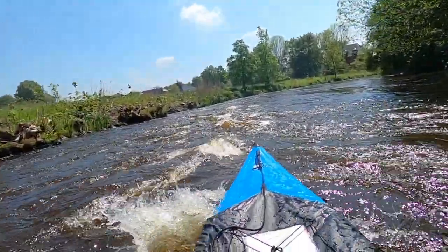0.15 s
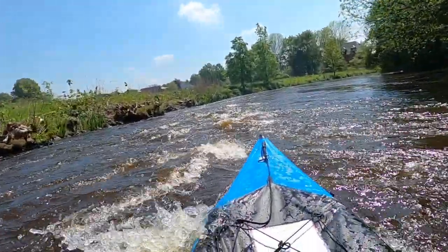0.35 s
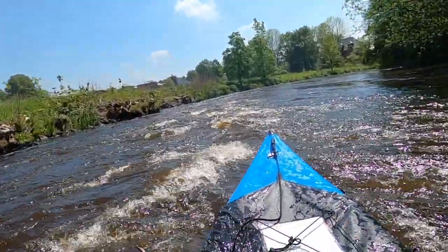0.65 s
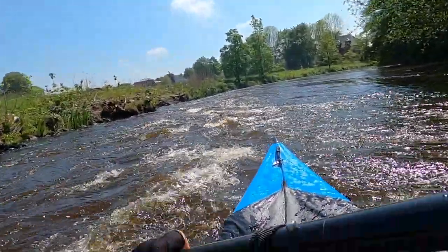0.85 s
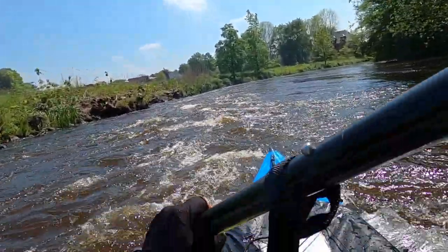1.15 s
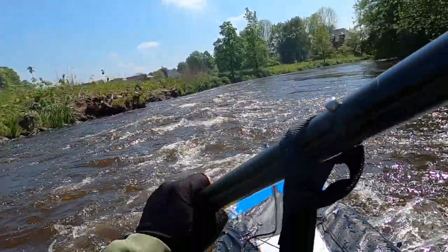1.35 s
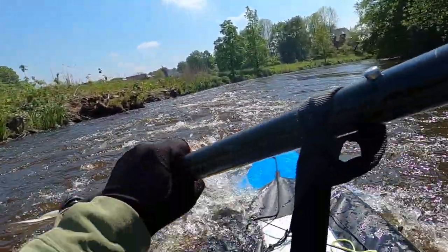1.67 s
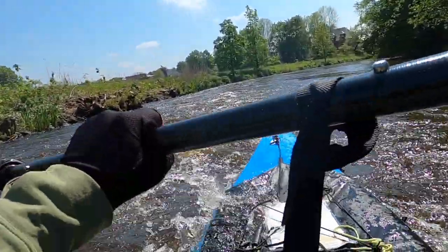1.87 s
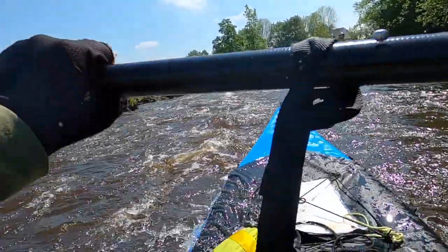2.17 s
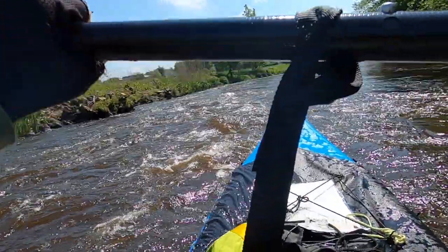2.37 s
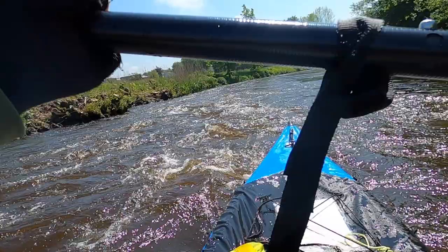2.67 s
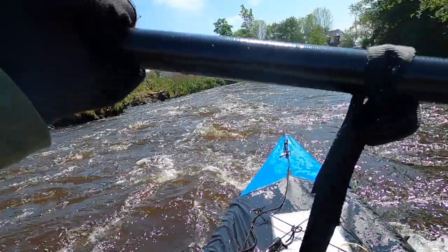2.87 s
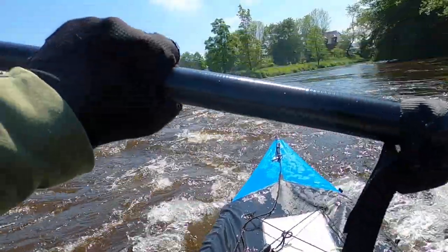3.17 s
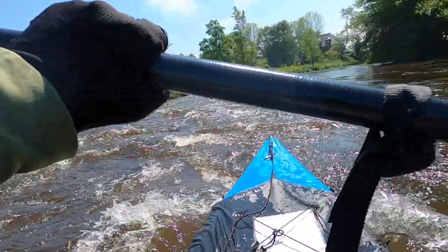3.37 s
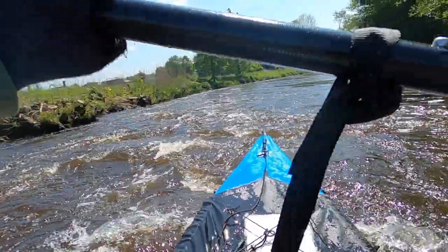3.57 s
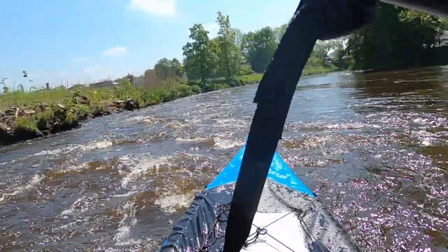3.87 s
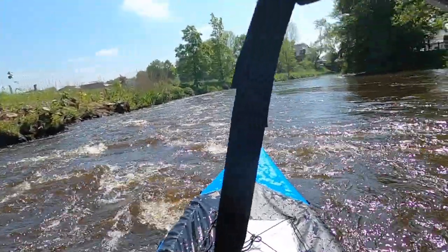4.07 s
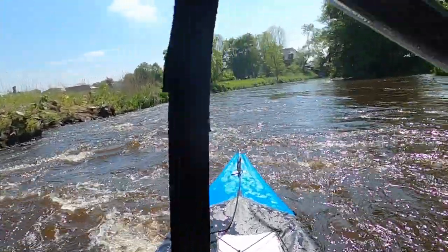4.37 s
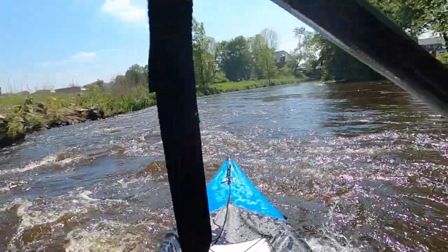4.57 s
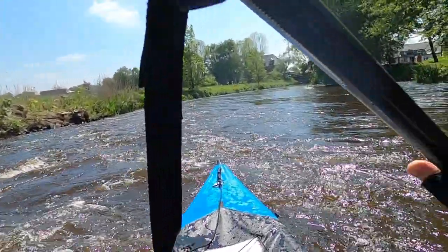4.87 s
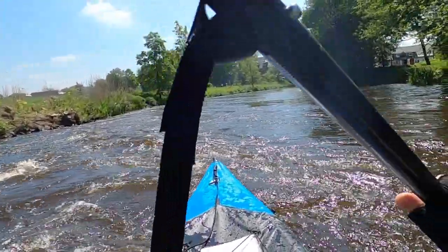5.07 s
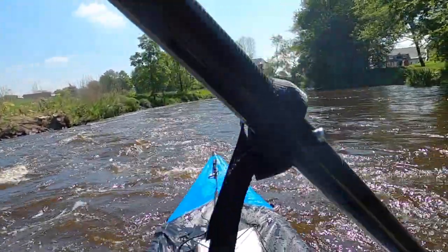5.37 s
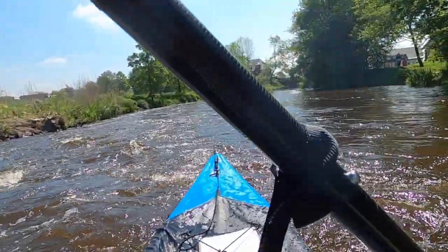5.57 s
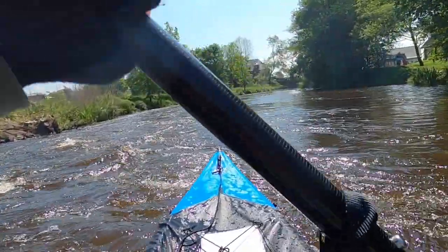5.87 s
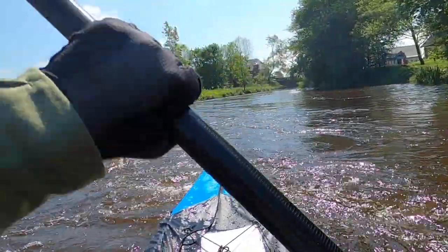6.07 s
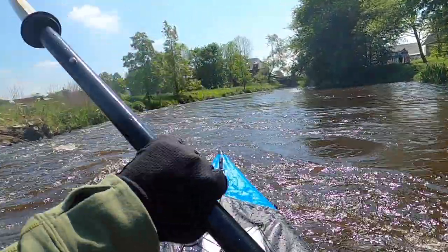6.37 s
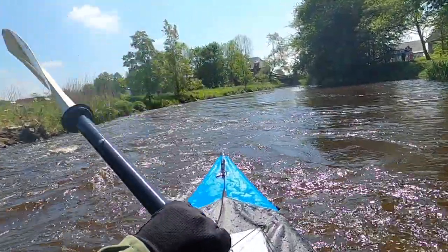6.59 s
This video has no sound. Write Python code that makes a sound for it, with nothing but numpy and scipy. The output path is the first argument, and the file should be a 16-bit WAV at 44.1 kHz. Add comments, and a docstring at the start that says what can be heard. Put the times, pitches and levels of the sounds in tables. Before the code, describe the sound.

White water churns and hisses around a kayak on a shallow river rapid, heard from a small camera on the paddler's chest. Air pockets gulp beside the boat, and the bow slaps down twice early on, with ticking drops and light paddle spray. Waves drum softly on the hull while wind rumbles on the microphone. The fizz gradually falls behind, leaving a quieter, lower wash.

```python
"""On a shallow river rapid, in a kayak, heard from a small camera on the paddler's chest.
White water churns and hisses with countless ringing bubbles, and falls behind as the river calms.
Air pockets gulp beside the boat, the bow slaps down twice, drops tick and the paddle throws spray.
Waves drum softly on the hull, and wind buffets the microphone."""
import sys
import numpy as np
from scipy import signal
from scipy.fft import rfft, irfft
from scipy.io import wavfile
from scipy.ndimage import uniform_filter1d

SR = 44100
rng = np.random.default_rng(int(sys.argv[2]) if len(sys.argv) > 2 else 0)


def master_out(mix):
    """Clip the mix to full scale and print it as 16-bit PCM to the path in sys.argv[1]."""
    frames = np.transpose(np.atleast_2d(mix))
    ceiling = np.clip(frames, -1, 1)
    pcm = np.round(ceiling * 32767).astype(np.int16)
    wavfile.write(sys.argv[1], SR, pcm)


N = 296793
TIME = np.arange(N) / SR


# Tone of the rapid and of the calmer water below it: f/Hz, level/dB. All table levels are relative.
RAPID_TONE = [(40, -16.5), (100, -5.5), (180, -1), (350, 0), (530, -1.5), (800, -5), (1300, -8.5),
              (2200, -14), (3000, -20.5), (3700, -25), (4400, -24.5), (5700, -40), (7000, -52.5),
              (8500, -72.5)]
CALM_TONE = [(40, -22.5), (85, -7.5), (120, -2), (200, -1), (340, 0), (530, -3.5), (800, -7), (1400, -11),
             (2200, -19), (3000, -27), (3700, -34), (4400, -33), (5700, -42.5), (6500, -42.5),
             (8500, -55.5)]
# Breaking waves, and dips between them (negative): crest t/s, rise t/s, churn level/dB, foam level/dB
WAVES = [(.03, 0.07, 0.5, 1.5), (.17, 0.083, -1, -.5), (.43, 0.0097, 0.5, 2), (.47, 0.018, -1.5, -4.5),
         (.65, .11, 5, 0.8), (.86, 0.089, 3, 2), (.97, 0.071, 2, 2), (1.3, 0.074, 2, 1),
         (1.55, 0.049, 0, -2.5), (1.69, 0.084, 4.5, 3), (1.92, 0.053, 2, 3), (2.12, 0.19, 3.5, 1.2),
         (2.47, 0.07, 0.4, 0.9), (2.81, 0.061, 2, -2), (3.06, 0.11, 0.5, 2.5), (3.26, 0.12, 2.5, 2.5),
         (3.47, 0.045, 1.8, 3.5), (3.65, 0.059, 0, 3.5), (3.82, 0.18, 3, 3.5), (4.86, 0.23, 3.5, 2.7),
         (5.08, 0.029, -2, -0.5), (5.2, 0.025, 6, -0.3), (5.44, 0.13, 1.5, -0.1), (5.7, 0.045, -3, -1),
         (6.16, 0.1, 1, 1.5), (6.38, 0.12, 3.5, 1.9), (6.72, 0.037, 2.5, 4)]

def river(leave_s=1.24, calming_s=2.67, calm_share=0.93):
    """Near bubbles and far foam swell with each wave and fade as the rapid falls behind."""
    water = foam() + amp(-3) * bubble_swarm()
    past_s = np.maximum(TIME - leave_s, 0)  # time since leaving the white water
    calm = calm_share * np.minimum(past_s / calming_s, 1)
    water = (1 - calm) * unit(colour(water, RAPID_TONE)) + calm * unit(colour(water, CALM_TONE))
    slosh_db = 0.78 * wander(11)  # all the water heaves
    flicker_db = -0.12 * wander(37)  # small bubbles flicker
    churn_db = sum(db * swell(s, rise) for s, rise, db, _ in WAVES)
    foam_db = sum(db * swell(s, rise) for s, rise, _, db in WAVES)
    # Low churn, middle wash and high fizz: the higher the part, the faster it fades.
    churn = steady(band(water, 1, 800))
    wash = steady(band(water, 800, 2500))
    fizz = steady(band(water, 2500, 12000))
    churn *= amp(-26.5 - 1.0853 * past_s + churn_db + slosh_db)
    wash *= amp(-31.5 - 1.88 * past_s + foam_db + slosh_db + flicker_db / 2)
    fizz *= amp(-43.5 - 2 * past_s + 0.93 * foam_db + slosh_db + flicker_db)
    return churn + wash + fizz


def foam(patchy_db=1.0, patch_s=0.068):
    """Far bubbles blur into a hiss; each range of sizes surges by itself as little waves break."""
    hiss = rng.standard_normal(N)
    edges_hz = np.r_[1, np.geomspace(150, 7000, 13), SR / 2]
    return unit(sum(band(hiss, lo, hi) * amp(patchy_db * wander(1 / patch_s))
                    for lo, hi in zip(edges_hz, edges_hz[1:])))


def bubble_swarm(density=5000, spread_db=3.0, sizes=56):
    """Bubbles of all sizes ring at random moments; the small, high ones are the most common."""
    swarm = np.zeros(N)
    for hz in np.geomspace(130, 8000, sizes):
        per_s = density * np.sqrt(hz / 1000) / sizes
        births = np.flatnonzero(rng.random(N) < per_s / SR)
        flip, luck = np.random.default_rng(rng.integers(2 ** 31)).random((len(births), 2)).T
        strength = np.minimum(-np.log(luck), 4)  # many weak pops, a few strong ones
        pops = np.zeros(N)
        pops[births] = np.sign(flip - 0.5) * amp(spread_db * strength)
        cycles = 29 * (hz / 1000) ** 0.4
        ring = bubble(hz, attack_s=0.5 / hz, ring_s=cycles / hz, glide=0.39)
        swarm += np.sqrt(hz) * unit(signal.oaconvolve(pops, ring)[:N])  # equal power per Hz
    return unit(swarm)


def bubble(hz, attack_s, ring_s, glide):
    """Trapped air rings, fading 60 dB in ring_s; its pitch slides `glide` octaves near the surface."""
    t = np.arange(int((attack_s + ring_s) * SR) + 2) / SR
    turns = np.cumsum(hz * 2 ** (glide * t / t[-1])) / SR
    onset = np.sin(np.pi / 2 * np.minimum(t / attack_s, 1)) ** 2
    fade = np.exp(-np.log(1000) * np.maximum(t - attack_s, 0) / ring_s)
    return onset * fade * np.sin(2 * np.pi * turns)


# Air pockets closing by the hull and paddle: t/s, level/dB, f/Hz, pitch slide/octaves, ring t/s
AIR_POCKETS = [(.058, -12, 415, 0.17, .07), (.437, -15, 436, 0.037, 0.064), (0.581, -12, 212, 0.72, 0.076),
               (.845, -14, 546, 0.13, 0.052), (.85, -18, 1300, -0.058, 0.079), (1.262, -21, 1050, .2, .04),
               (1.359, -9, 352, 1.14, 0.095), (1.604, -14.5, 510, -0.16, 0.046),
               (1.872, -7.5, 109, 0.56, 0.18), (1.922, -11.5, 167, -0.023, 0.16), (2.03, -19, 510, .4, .06),
               (2.211, -13, 741, -0.2, 0.063), (3.034, -17, 480, 0.096, 0.047),
               (4.124, -20, 275, -0.16, 0.082), (4.517, -20.5, 290, -0.2, 0.06),
               (5.162, -17.5, 207, 0.51, .12), (5.472, -20, 112, -0.38, 0.12),
               (5.543, -22.5, 264, 0.35, 0.12), (6.01, -22.5, 77, 0.19, .36), (6.293, -21, 360, 0.5, 0.074),
               (6.39, -27, 168, -0.1, .13)]

def gulps(gain_db=-1):
    """Big air pockets ring once each; the lower the note, the slower it swells."""
    out = np.zeros(N)
    for s, db, hz, glide, ring_s in AIR_POCKETS:
        attack_s = 0.006 * np.sqrt(348 / hz)
        add(out, s, amp(db + gain_db) * bubble(hz, attack_s, ring_s, glide))
    return out


# The bow (front of the boat) landing: t/s, level/dB, boom level/dB compared with the knock
BOW_SLAPS = [(1.501, -6.5, -5.5), (1.815, -8.5, -14.5)]

def bow_slaps(gain_db=-1, boom_delay_s=0.007):
    """The bow hits the water with a short knock, then the air under it booms."""
    knock = bubble(hz=325, attack_s=0.0029, ring_s=0.019, glide=-0.34)
    boom = bubble(hz=184, attack_s=0.0029, ring_s=0.076, glide=0)
    out = np.zeros(N)
    for s, db, boom_db in BOW_SLAPS:
        add(out, s, amp(db + gain_db) * knock)
        add(out, s + boom_delay_s, amp(db + gain_db + boom_db) * boom)
    return out


# Tone of one drop's splat: f/Hz, level/dB
SPLAT_TONE = [(200, -32.5), (800, -18), (2400, 2), (3600, 1.5), (5000, -7.5), (7000, -23.5), (8500, -45)]
# Drops landing close by, and at 1.465 s a short air pocket closing with a faint splat: t/s, level/dB, ring
# f/Hz, extra splat level/dB, ring t/s
DROPS = [(.349, -23, 2860, -8, .014), (.855, -24, 4330, -8, .018), (.878, -12.5, 1740, -9, .014),
         (1.12, -16.5, 3730, 5.5, .009), (1.125, -19, 2430, -5, .016), (1.465, -7.5, 1265, -17, .026),
         (1.678, -19, 2380, -11, .018), (1.703, -18, 3380, 0, 0.012), (2.093, -26, 4140, -13, .018),
         (2.412, -38, 6200, 3, .012), (2.453, -26, 3150, 4, .012), (2.616, -37, 3960, 6, .012),
         (3.492, -39, 6700, 14, .014), (4.15, -39, 7060, -7, .018), (4.183, -38, 5170, -10, .018),
         (4.663, -24.5, 2470, -6, .014), (4.86, -33, 3490, 7, .012), (5.23, -32.5, 4390, 3, .014),
         (5.245, -27, 3190, -3, .01), (5.274, -32.5, 4420, 1, .012), (5.571, -29, 3060, -4, .01),
         (6.174, -24.5, 3530, -14, .011), (6.377, -27, 2850, -3, .013), (6.421, -33, 3140, -3, .009)]

def drops(ring_db=-6.5, splat_db=-2.5, spatter_db=-19, spatter_s=0.0016):
    """Each drop lands with a sharp tick, a short spatter and a small ring."""
    out = np.zeros(N)
    t = np.arange(2048) / SR
    tick = t == 0
    for s, db, hz, extra_db, ring_s in DROPS:
        spatter = amp(spatter_db) * rng.standard_normal(len(t)) * np.exp(-t / spatter_s)
        splat = colour(np.pad(tick + spatter, len(t)), SPLAT_TONE)
        splat /= abs(splat).max()
        add(out, s - len(t) / SR, amp(db + splat_db + extra_db) * splat)  # early by the padding
        add(out, s, amp(db + ring_db) * bubble(hz, 2 / hz, ring_s, glide=0.085))
    return out


# Tone of the spray: f/Hz, level/dB
SPRAY_TONE = [(300, -14), (1500, 8.5), (4400, 0), (5700, -12.5), (6500, -16.5), (7700, -29), (8500, -46)]
# Showers thrown by the bow and paddle: start t/s, length t/s, level/dB
SHOWERS = [(0.845, 0.043, -32.5), (.91, 0.073, -43), (1.558, 0.22, -40), (2.392, 0.12, -39.5),
           (2.594, 0.065, -37), (3.562, 0.15, -47), (5.473, .008, -45), (6.372, .014, -48)]

def spray(drops_per_s=900):
    """Thrown water comes down as a crisp patter."""
    ticks = rng.standard_normal(N) * (rng.random(N) < drops_per_s / SR)
    loudness = np.zeros(N)
    for s, length_s, db in SHOWERS:
        add(loudness, s, amp(db) * signal.windows.tukey(int(length_s * SR), 0.5))
    return unit(colour(ticks, SPRAY_TONE)) * loudness


# The deep tone of the hull: f/Hz, level/dB
HULL_TONE = [(50, -29.5), (90, -9.5), (118, -5), (160, -8.5), (260, -31), (900, -81.5)]
# Waves drumming on the hull: peak t/s, rise t/s, level/dB
HULL_WAVES = [(.88, 0.066, -34), (1.97, 0.15, -28.5), (2.25, 0.33, -34), (4.35, 0.48, -35),
              (6.13, 0.064, -37), (6.5, 0.74, -34.5)]

def hull(wobble_db=2):
    """The skin of the boat booms softly under the waves."""
    boom = colour(rng.standard_normal(N), HULL_TONE)
    return unit(boom * amp(wobble_db * wander(15))) * surges(HULL_WAVES, base_db=-47)


# Tone of the wind: f/Hz, level/dB
WIND_TONE = [(4, -15), (14, 1), (30, 0.5), (60, -4), (110, -14), (200, -30.5), (500, -45), (2000, -93.5)]
# Gusts over a light breeze: peak t/s, rise t/s, level/dB
GUSTS = [(.1, 0.051, -23.5), (.84, 0.063, -22.5), (1.35, 0.15, -23.5), (2.17, 0.33, -23.5),
         (2.58, 0.21, -25), (2.92, 0.17, -27.5), (3.1, 0.099, -23), (3.9, 0.23, -28), (4.65, 0.051, -24),
         (4.95, 0.17, -28), (5.35, 0.08, -34), (6.1, 0.078, -42), (6.7, 0.12, -21)]
# Swirls of air striking the microphone: peak t/s, level/dB, f/Hz, half length t/s
SWIRLS = [(0.129, -20, 28, 0.011), (1.3, -16, 70, 0.011), (1.336, -16, 34.6, 0.011),
          (1.443, -14, 25, 0.022), (2.169, -11.5, 70.6, 0.02), (2.238, -29, 34.5, 0.013),
          (2.495, -11, 86.4, 0.0089), (2.685, -6.5, 83, 0.0057), (3.127, -11, 68, 0.0074),
          (6.665, -7, 65, 0.0039), (6.709, -18, 78.5, 0.03)]

def wind(gain_db=-2, lumpy_db=2.0, wake_db=-10):
    """Lumpy air rumbles on the microphone; strong swirls push and pull it and leave a rough wake."""
    air = unit(colour(rng.standard_normal(N), WIND_TONE))
    strength_db = 20 * np.log10(surges(GUSTS, base_db=-31 - 1.5 * TIME))
    rumble = band(air, 45, 3000)
    brightness = amp(0.1 * (strength_db + 21))  # small swirls grow faster than big ones in a gust
    out = air - rumble + rumble * brightness
    out *= amp(strength_db + gain_db + lumpy_db * np.tanh(wander(9.2)))
    wake = amp(wake_db) * unit(band(rng.standard_normal(N), 95, 190))
    for s, db, hz, half_s in SWIRLS:
        t = TIME - s
        push = np.cos(2 * np.pi * (hz * t + rng.random()))
        out += amp(db + gain_db) * np.exp(-(t / half_s) ** 2) * (push + wake)
    return out


def swell(s, rise_s, tail=1.26):
    """A smooth hump of height 1 at time s; it takes `tail` times as long to fall as to rise."""
    late = (TIME - s) / rise_s
    return np.exp(-np.where(late < 0, late, late / tail) ** 2)


def surges(rows, base_db):
    """Loudness of a background and the swells that rise out of it; their powers add."""
    return np.sqrt(amp(base_db) ** 2 + sum((amp(db) * swell(s, rise)) ** 2 for s, rise, db in rows))


def wander(rate_hz):
    """A random drift of typical size 1, with little motion faster than rate_hz."""
    hz = np.fft.rfftfreq(N, 1 / SR)
    return unit(irfft(rfft(rng.standard_normal(N)) / np.sqrt(1 + (hz / rate_hz) ** 4), N))


def colour(x, tone):
    """Turns each frequency up or down as a tone table says."""
    hz = np.fft.rfftfreq(len(x), 1 / SR)
    tone_hz, tone_db = np.transpose(tone)
    db = np.interp(np.log(hz + 1), np.log(tone_hz + 1), tone_db)
    return irfft(rfft(x) * amp(db), len(x))


def band(x, lo_hz, hi_hz):
    """Keeps the frequencies between two soft edges."""
    hz = np.fft.rfftfreq(len(x), 1 / SR)
    below = lambda edge: 1 / (1 + (hz / edge) ** 8)
    return irfft(rfft(x) * (below(hi_hz) - below(lo_hz)), len(x))


def steady(x):
    """Evens out the loudness over each quarter second."""
    return x / np.sqrt(uniform_filter1d(x ** 2, size=SR // 4))


def unit(x):
    """Scales a signal to a typical size (rms) of 1."""
    return x / np.sqrt(np.mean(x ** 2) + 1e-20)


def amp(db):
    """Turns decibels into a multiplier."""
    return 10 ** (np.asarray(db) / 20)


def add(mix, s, sound):
    """Mixes a sound in at s seconds."""
    part = mix[max(round(s * SR), 0):][:len(sound)]
    part += sound[:len(part)]


def scene():
    """Water all around and against the boat, and wind at the microphone, in one channel."""
    return (river() + hull() + gulps() + bow_slaps() + drops() + spray() + wind())[None]


def record(dry):
    """The camera cuts off the treble above 8600 Hz; both ends of the sound fade very briefly."""
    faded = dry * signal.windows.tukey(N, 0.001)
    treble_cut = signal.firwin(801, 8600, window=("kaiser", 9), fs=SR)
    return signal.oaconvolve(faded, treble_cut[None], "same")


dry = scene()
out = record(dry)
master_out(out)
```